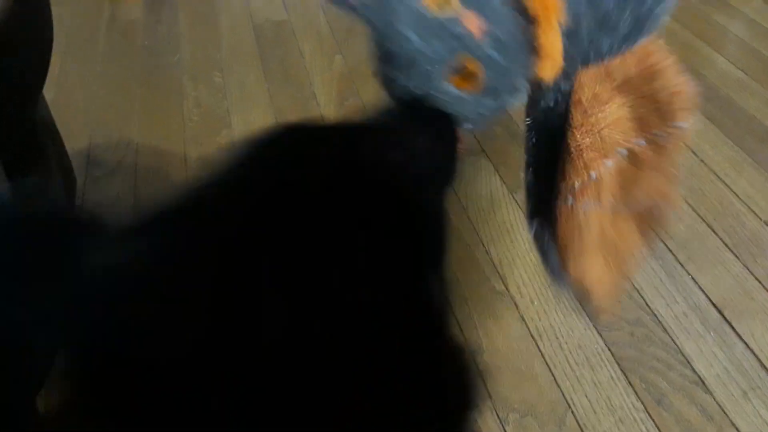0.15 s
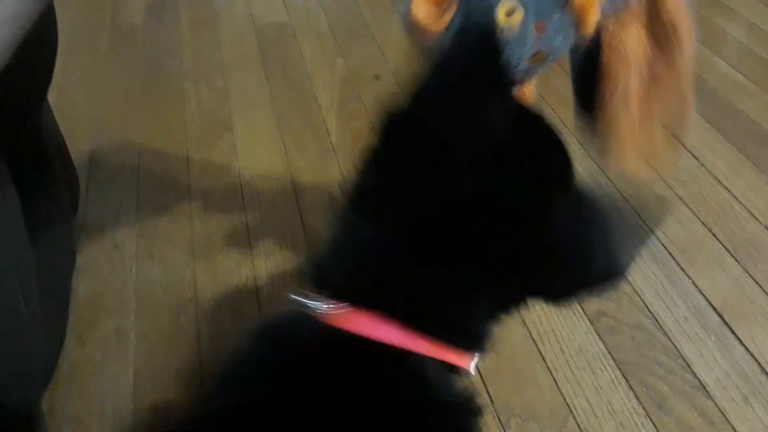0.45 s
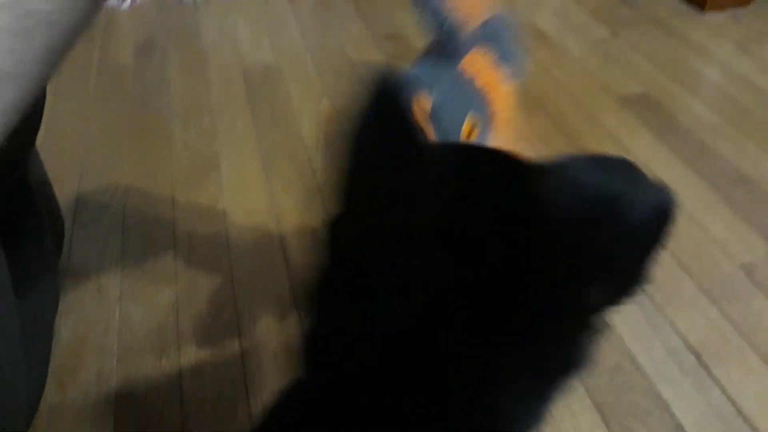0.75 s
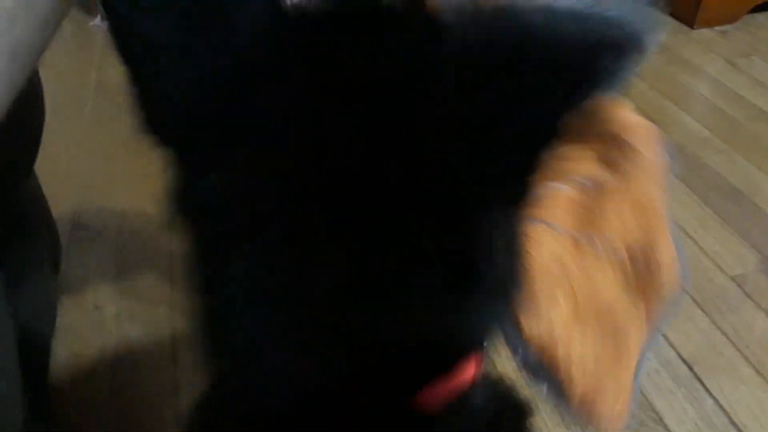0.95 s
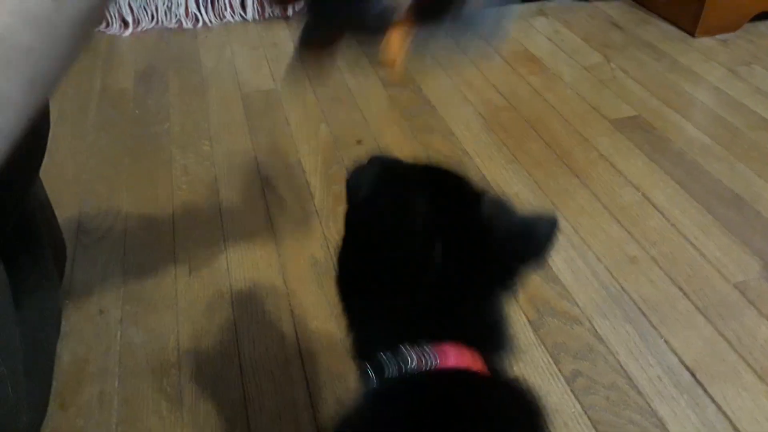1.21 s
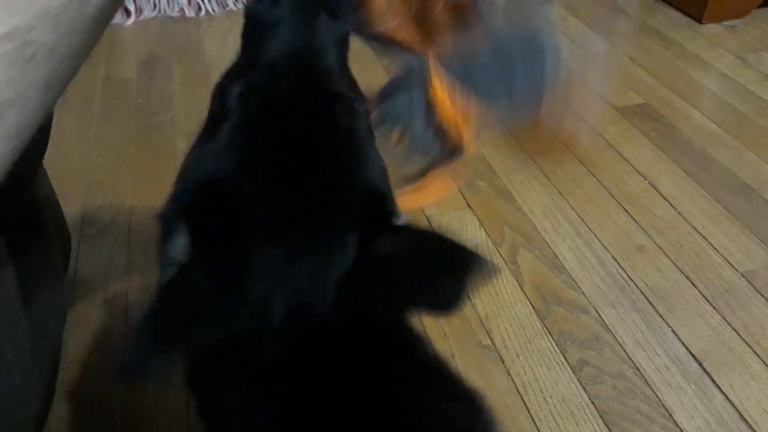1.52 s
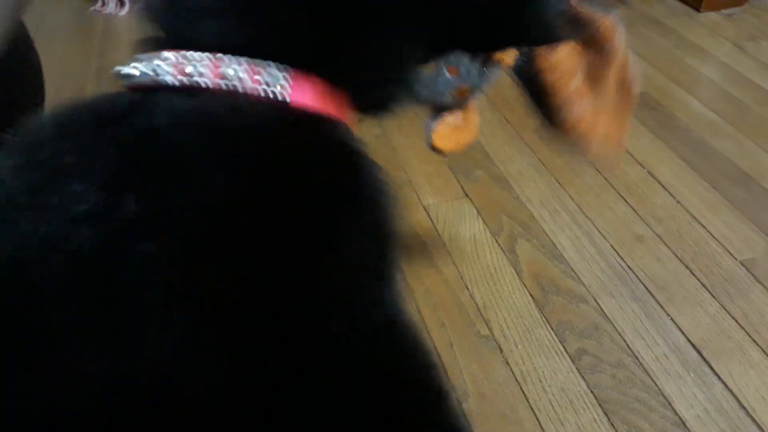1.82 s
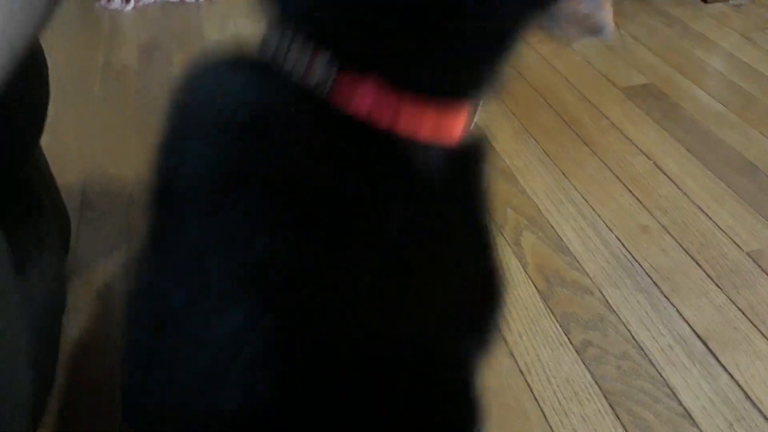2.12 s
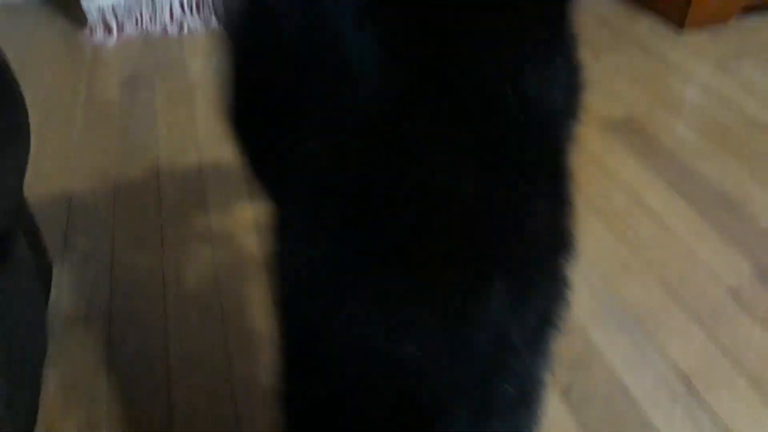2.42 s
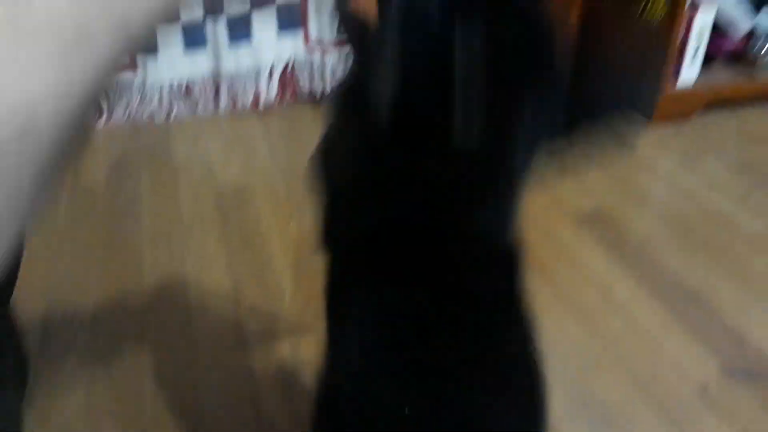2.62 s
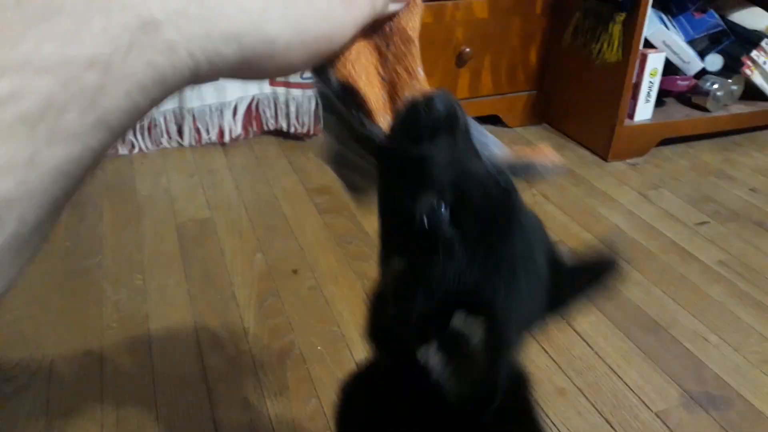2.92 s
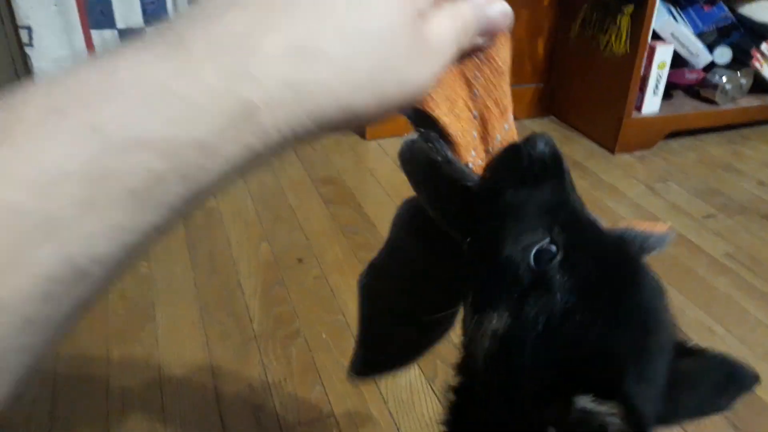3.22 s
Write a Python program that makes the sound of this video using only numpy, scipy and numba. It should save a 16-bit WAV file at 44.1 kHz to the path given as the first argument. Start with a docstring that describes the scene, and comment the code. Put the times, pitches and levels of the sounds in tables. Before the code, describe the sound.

Close, dry crackling of a crinkly dog toy runs throughout, with loud snaps, brief lulls and a final busy flurry; hollow paw knocks on wood come mid-way and near the end in a small room.

```python
"""Puppy tugging a crinkle toy

A puppy bites and tugs a plush toy with crinkle film inside, close to a phone in a room with a wooden floor.
The film buckles in short clusters of clicks, louder when the toy is worked hard; two hollows colour them.
Paws ring the floor boards as decaying sines; falling knocks and a thin squeak are gliding sines.
Shaped noise makes the low rumble. The two microphone ports nearly agree in the bass and part in the treble."""
import sys
import numpy as np
from scipy import signal
from scipy.fft import rfft, irfft
from scipy.io import wavfile
from scipy.ndimage import uniform_filter1d
from numba import njit

SR = 44100
rng = np.random.default_rng(int(sys.argv[2]) if len(sys.argv) > 2 else 0)


def generate_wav(signal):
    """Clip the signal to [-1, 1] and save it as 16-bit WAV at the path in sys.argv[1]."""
    frames = np.transpose(np.atleast_2d(signal))
    scaled = np.clip(frames, -1, 1) * 32767
    pcm = np.round(scaled).astype(np.int16)
    wavfile.write(sys.argv[1], SR, pcm)


N = 147735


def undb(db):
    """Decibels to an amplitude factor."""
    return 10 ** (np.asarray(db) / 20)


def rms(x):
    """Root mean square level."""
    return np.sqrt(np.mean(x ** 2))


def on_log(table, hz):
    """A (Hz, dB) table read on a log frequency axis."""
    f, db = np.array(table, float).T
    return np.interp(np.log(np.maximum(hz, 1)), np.log(np.maximum(f, 1)), db)


def causal(db):
    """Short causal (minimum-phase) response with the given gains on an even frequency grid."""
    cepstrum = irfft(db * np.log(10) / 20)
    cepstrum[1:len(db) - 1] *= 2
    cepstrum[len(db):] = 0
    return irfft(np.exp(rfft(cepstrum)))


# Swell of the low rumble under the take. Each row: time in seconds, level in dB before RUMBLE_GAIN_DB.
RUMBLE_LEVEL = [(0.0, -78), (0.23, -85), (0.38, -71), (0.45, -73), (0.58, -72), (1.2, -65), (1.34, -58),
                (1.41, -59), (1.56, -67), (1.87, -65), (2.02, -70), (2.23, -75), (3.13, -61), (3.27, -75),
                (3.35, -69)]
# Colour of the rumble in the room. Each row: frequency in Hz, relative level in dB per Hz.
RUMBLE_SPECTRUM = [(15, -55), (25, -10), (86, 2), (128, 6), (151, 3), (172, -2.5), (251, -10), (400, -11),
                   (520, -12), (880, -120)]
RUMBLE_GAIN_DB = 3
RUMBLE_SIDE = .2  # amount of opposite noise at the two ports


def room_tone():
    """A low rumble of shaped noise that swells as the dog moves, nearly the same at both ports."""
    hz = np.arange(N // 2 + 1) * SR / N
    gain = undb(on_log(RUMBLE_SPECTRUM, hz)) * (hz > 15)
    mid, side = irfft(rfft(rng.standard_normal((2, N))) * gain, N)
    level = undb(RUMBLE_GAIN_DB + np.interp(np.arange(N) / SR, *np.array(RUMBLE_LEVEL).T))
    return level / rms(mid) * (mid + RUMBLE_SIDE * side * np.array([[1], [-1]]))


# Hollow knocks that fall in pitch.
# Each row: start in seconds, level in dB before rise and fade, start pitch in Hz, fall in Hz per second.
FALLING_KNOCKS = [(0.493, -44, 375, 2300), (1.213, -37.5, 418, 1780), (1.419, -35.5, 385.6, 2220)]
FALL_RISE_S, FALL_T60_S = .004, 0.25


def falls():
    """Short low tones that sag in pitch, by an octave at most, as they fade."""
    out = 0
    for at, db, hz, fall in FALLING_KNOCKS:
        t = np.maximum(np.arange(N) / SR - at, 0)
        pitch = np.maximum(hz - fall * t, hz / 2)
        rise = 1 - np.exp(-t / FALL_RISE_S)
        fade = undb(db - 60 * t / FALL_T60_S)
        out = out + fade * rise * np.sin(2 * np.pi * np.cumsum(pitch) / SR)
    return out


# A thin squeak that glides down. Each row: time in seconds, pitch in Hz, level in dB before the port gains.
SQUEAK_GLIDE = [(2.92, 10600, -85), (2.945, 10350, -60), (2.975, 9850, -60), (3.0, 9400, -64),
                (3.02, 9300, -85)]


def squeak():
    """A faint whistle, its gliding sine made unsteady by smoothed noise, louder at the right port."""
    at, hz, db = np.array(SQUEAK_GLIDE).T
    t = np.arange(N) / SR
    rough = 1 + 4.0 * uniform_filter1d(rng.standard_normal(N), size=200)
    level = undb(np.interp(t, at, db, -140, -140))
    pitch = np.interp(t, at, hz)
    tone = level * rough * np.sin(2 * np.pi * np.cumsum(pitch) / SR)
    return tone * np.array([[.4], [1.6]])  # left, right


# Paws on the boards. Each row: start in seconds, level in dB before THUD_GAIN_DB, length of the push in
# seconds, pitch of that spot as a ratio to the board modes.
PAW_THUDS = [(0.236, -40.5, 0.0061, 0.73), (0.325, -52, 0.0019, 1.15), (0.496, -47, 0.0013, 1.12),
             (0.677, -59, 0.0031, 1.0), (0.841, -56, 0.002, 0.86), (1.177, -40, 0.0014, 0.92),
             (1.216, -27, 0.0023, 1.11), (1.246, -36, 0.0042, 1.02), (1.275, -39, 0.0037, 1.14),
             (1.339, -39, 0.0034, 1.0), (1.419, -23, 0.0025, 0.94), (1.442, -32.5, 0.0038, 0.91),
             (1.471, -34, 0.0046, 0.91), (1.493, -33.5, 0.0018, 0.96), (1.528, -40, 0.0016, 1.02),
             (2.247, -61, 0.0031, 1.06), (2.527, -49, 0.0032, 1), (2.736, -38.5, 0.0016, 0.96),
             (2.921, -33.5, 0.005, .85), (2.956, -42, 0.004, 1.1), (3.016, -36.5, 0.003, 0.86),
             (3.049, -50, 0.003, 1.1), (3.1, -52, 0.0049, 0.95), (3.158, -50, 0.0026, 1),
             (3.201, -41, 0.0033, 1.28), (3.226, -45, 0.0035, .85), (3.259, -49, 0.0035, 0.84),
             (3.305, -58, 0.0051, 0.64)]
# Modes of the wooden floor. Each row: frequency in Hz before the spot's ratio, level in dB before the
# paw's own spread, time to fall by 60 dB in seconds.
BOARD_MODES = [(108, -1, 0.051), (145.7, -1.5, 0.27), (187, 2.5, 0.23), (240, 1.5, 0.088),
               (320, -2.5, 0.15), (399, 3.5, 0.053), (513, 3, 0.082)]
THUD_GAIN_DB, PAW_SPREAD_DB = -8.5, 2
BASS_CUT_HZ = 91


def thuds():
    """A soft push of a paw rings the floor boards: decaying sines smoothed over the length of the push."""
    t = np.arange(int(.4 * SR)) / SR
    out = np.zeros(N + SR)
    turns = rng.standard_normal((len(PAW_THUDS), len(BOARD_MODES)))
    for (at, db, push, pitch), turn in zip(PAW_THUDS, turns):
        ring = np.zeros(len(t))
        for k, (hz, mode_db, t60) in enumerate(BOARD_MODES):
            decay = undb(mode_db + PAW_SPREAD_DB * turn[k] - 60 * t / t60)
            ring += (-1) ** k * decay * np.sin(2 * np.pi * pitch * hz * t)
        pad = np.hanning(max(int(push * SR), 3))
        thud = np.convolve(ring, pad / pad.sum())[:len(t)]
        start = int(at * SR)
        out[start:start + len(t)] += undb(db + THUD_GAIN_DB) * thud
    return signal.sosfilt(signal.butter(2, BASS_CUT_HZ, "high", fs=SR, output="sos"), out[:N])


ECHO_DB, ECHO_T60_S = -10.5, .2


def room(x):
    """The room's short tail is fading noise, shared by the ports in the bass and separate in the treble."""
    t = np.arange(int(.4 * SR)) / SR
    noise = rng.standard_normal((2, len(t)))
    low = signal.sosfilt(signal.butter(2, 1600, fs=SR, output="sos"), noise)
    unit_energy = np.sqrt(2 * np.log(1000) / ECHO_T60_S / SR)
    shape = undb(ECHO_DB - 60 * t / ECHO_T60_S) * unit_energy * (t > .003)
    tail = (noise - low + low[0]) * shape
    return x + signal.fftconvolve(x, tail, axes=1)[:, :N]


@njit
def band(x, hz, width):
    """Resonant band-pass whose centre may move every sample, gain 1 at the centre."""
    y, b, l = np.empty(len(x)), 0., 0.  # b and l are the band and low states
    for i in range(len(x)):
        g, k = np.tan(np.pi * hz[i] / 44100), width / hz[i]
        v = (b + g * (x[i] - l)) / (1 + g * (g + k))
        b, l, y[i] = 2 * v - b, l + 2 * g * v, k * v
    return y


# Two hollows of the toy that colour the crackle.
# Each row: time in seconds, lower pitch in Hz, upper pitch in Hz, share added in dB.
TOY_HOLLOWS = [(0, 4320, 5660, -2), (.5, 4350, 5130, -4.5), (1.0, 4500, 5130, -3.5), (1.5, 4330, 5600, -1),
               (1.85, 4400, 5000, 3), (2.2, 5360, 6000, -23), (2.45, 4240, 6040, -18),
               (2.75, 4230, 5240, -2.5), (2.95, 4000, 5130, 1.5), (3.1, 4140, 5120, 5.5),
               (3.35, 4100, 4870, 5)]
HOLLOW_WIDTH_HZ = 142.


def hollows(x):
    """The toy's two hollows ring along as moving resonances and shift as it is squeezed."""
    table = np.array(TOY_HOLLOWS, float).T
    low, high, db = (np.interp(np.arange(N) / SR, table[0], column) for column in table[1:])
    ports = []
    for port in x:
        ringing = band(port, low, HOLLOW_WIDTH_HZ) + band(port, high, HOLLOW_WIDTH_HZ)
        ports.append(port + undb(db) * ringing)
    return np.array(ports)


# Colour of the crinkle film. Each row: frequency in Hz, relative level in dB per Hz.
FILM_COLOUR = [(150, -46.5), (260, -28), (326, -18), (415, -17), (528, -21.5), (586, -16), (759, -15.5),
               (1110, -7), (1460, -15), (1740, -8), (1970, -11), (2420, -4), (3360, -6.5), (3700, -4),
               (4350, -1), (5600, -3), (6940, -6.5), (8250, -17), (11900, -23.5), (15100, -30),
               (16200, -41)]
# Difference between the microphone ports. Each row: frequency in Hz, left minus right in dB.
PORT_DIFFERENCE = [(1300, 0.5), (2400, 1.5), (4400, -6.5), (6000, -7.5), (8100, -7), (11000, -12.5),
                   (15000, -5)]
# Where the toy is held before the phone. Each row: time in seconds, left minus right in dB, before
# scaling by the share that differs between the ports.
TOY_SIDEWAYS = [(0, 10), (.8, -1), (2.3, 1), (3.35, -6.5)]
BUCKLE_S = .0011  # standard deviation of click times about the middle of a cluster
MAIN_CLICK = 1.75  # size of the middle click against the others' standard deviation
LAG_S, LAG_SPREAD_S = -0.000073, .00008  # left behind right, negative when left leads
LOW_HZ, HIGH_HZ = 1600, 7986  # edges of the low and high parts
APART_HZ = 2620  # around this the ports begin to hear each click at different strength
APART_MOST = 0.72  # largest share of a click that differs between the ports


def film(t, db, low_db, high_db, colour_db, count):
    """Each buckle is a swelling and fading cluster of clicks with its own colour and lag between the ports."""
    grid = np.linspace(0, SR / 2, 1025)
    centres = 250 * 2 ** np.arange(0, 6.5, .5)  # half-octave bands, Hz
    each = rng.standard_normal((len(t), len(centres) + 1))  # colour per band, then lag
    hit = rng.standard_normal((len(t), count, 4))  # time, shared size, left size, right size
    hit[:, 0, 0] = 0
    hit[:, 0, 1:] = MAIN_CLICK * np.sign(hit[:, 0, 1:])
    side_db = np.interp(t, *np.array(TOY_SIDEWAYS).T)[:, None]
    late = BUCKLE_S * hit[..., 0]
    lag = (LAG_S + LAG_SPREAD_S * each[:, -1:]) / 2
    out = np.zeros((2, N))
    for k, hz in enumerate(centres):
        tilt = low_db * (hz < LOW_HZ) + high_db * (hz > HIGH_HZ)
        size = undb(db + tilt + colour_db * each[:, k])[:, None]
        bell = np.maximum(-6 * (np.log2(np.maximum(grid, 1) / hz) / .5) ** 2, -50)
        apart = APART_MOST / (1 + (APART_HZ / hz) ** 3)
        for port, sign in enumerate((1, -1)):  # left, right
            clicks = np.sqrt(1 - apart) * hit[..., 1] + np.sqrt(apart) * hit[..., 2 + port]
            clicks = clicks / np.sqrt(np.sum(clicks ** 2, axis=1, keepdims=True))  # same energy per cluster
            clicks = size * clicks * undb(sign * apart * side_db / 2)
            at = np.clip(((t[:, None] + late + sign * lag) * SR).astype(int), 0, N - 1)
            train = np.bincount(at.ravel(), clicks.ravel(), N)
            ring = causal(bell + on_log(FILM_COLOUR, grid) + sign * on_log(PORT_DIFFERENCE, grid) / 2)
            out[port] += signal.oaconvolve(train, ring)[:N]
    return out


# How hard the toy is worked. Each row: time in seconds, crackle level in dB before CRACKLE_GAIN_DB, low part
# and high part in dB, both taken against their average over the buckles.
TUG_STRENGTH = [(0.0, -35, -3.5, -7), (0.041, -45, -29, -24), (0.11, -36.5, -3.5, -0.5),
                (0.14, -33.5, -16.5, -13.5), (0.251, -30.5, -1.5, -8), (0.321, -38, -8.5, -14.5),
                (0.33, -29, -4, -2.5), (0.37, -29.5, -13, -17), (0.38, -26, -2.5, -6.5),
                (0.47, -40.5, -15.5, -18), (0.48, -32.5, 0.5, -5.5), (0.57, -40, -14, -9.5),
                (0.611, -29, -4, -4.5), (0.67, -36.5, -12.5, -9), (0.68, -31, -1, 0), (0.74, -43, -10, -8),
                (0.75, -36, -6, 0), (0.791, -42, -19, -14), (0.84, -33.5, -7.5, -11.5),
                (1.031, -31, -8, -7), (1.05, -36.5, -6.5, -21), (1.091, -28.5, -6, -8.5),
                (1.27, -38, -7.5, -6.5), (1.289, -42.5, 0, -16), (1.339, -30.5, -2, -2.5),
                (1.47, -35, -13, -16.5), (1.54, -28, -14.5, -8), (1.558, -23, -0.5, -3),
                (1.599, -29, -11.5, -5.5), (1.69, -36.5, -6, -9.5), (1.789, -35, -3.5, -9),
                (1.809, -27, -3.5, -6), (1.87, -34.5, -9.5, -15), (1.92, -31, -4, -6.5),
                (2.021, -38.5, 1, -5.5), (2.05, -45.5, -15, -17), (2.201, -35.5, -8.5, -8),
                (2.231, -47.5, -5, -14), (2.322, -30, -14, -8.5), (2.549, -43, -18.5, -9.5),
                (2.579, -35, -6, -5), (2.62, -33, -14.5, -10), (2.76, -23, -5.5, -2.5),
                (2.839, -40, -14.5, -13), (2.86, -36, -6.5, -10), (2.99, -40.5, -9, -9),
                (3.08, -32, -8, -3.5), (3.13, -38.5, -12, -11), (3.16, -31.5, -10.5, -10),
                (3.289, -48.5, -11.5, -21), (3.34, -34.5, -9.5, -18), (3.35, -45, -7, -20)]
CRACKLES_PER_S, CRACKLE_GAIN_DB, CRACKLE_COLOUR_DB = 1700, 13.5, 4.5
CRACKLE_SPREAD_DB, BIGGEST_CRACKLE_DB = 2, 5.5  # mean before the limit, and limit, over the smallest


def crackle():
    """Many small buckles at random moments and of scattered size, their level following the tug."""
    chance = rng.random((int(CRACKLES_PER_S * N / SR), 2))
    t = chance[:, 0] * N / SR
    tug = np.array(TUG_STRENGTH).T
    level, low, high = (np.interp(t, tug[0], column) for column in tug[1:])
    size_db = np.minimum(-CRACKLE_SPREAD_DB * np.log(1 - chance[:, 1]), BIGGEST_CRACKLE_DB)
    power_db = 10 * np.log10(np.mean(undb(2 * size_db)) * len(t) / N)  # mean power per sample
    db = level + size_db - power_db + CRACKLE_GAIN_DB
    return film(t, db, low - low.mean(), high - high.mean(), CRACKLE_COLOUR_DB, count=4)


# Loudest snaps of the film, close to the phone. Each row: middle in seconds, level in dB before SNAP_GAIN_DB,
# extra low part in dB, extra high part in dB, both before the limit of 6 dB either way.
FILM_SNAPS = [(0.0082, -23, 0, 3), (0.016, -36, 2, 4), (0.027, -18, -3, 3), (0.04, -29, -1, -4),
              (0.0613, -20.5, 7, 3), (0.079, -27, -8, 5), (0.109, -22, -11, -2), (0.128, -20, 8, 6),
              (0.1824, -6.5, 2.5, -3), (0.1946, -25, -7, 2), (0.2257, -14, 15, -2), (0.2407, -9, -2, 7),
              (0.245, -18, -3, 3), (0.2532, -7, -11, 7), (0.274, -17, 7, 6), (0.3047, -23, -5, 7),
              (0.3196, -15, 7, 0), (0.3323, -28, 7, 4), (0.3483, -12, 2, -4), (0.3624, -20, 1, 7),
              (0.382, -4.5, 1, -3), (0.439, -13, 0, -11), (0.4486, -15, 3, 6), (0.4647, -18, 8, 0),
              (0.4796, -9, -2, 4), (0.4946, -15, -2, -10), (0.503, -11, 5, 6), (0.546, -26, 9, 3),
              (0.554, -18, 3, 0), (0.568, -19, -2, 0), (0.5809, -27, -4, 0), (0.6224, -13, 11, -3),
              (0.6334, -14, -2, 8), (0.6862, -21.4, 0, -3), (0.714, -25.1, 0, -4), (0.743, -23, -3, -2),
              (0.7637, -21.2, -4, -4), (0.7986, -28.7, -2, 0), (0.822, -23, 5, -1), (0.829, -9, 3, -1),
              (0.8383, -13, -4, -9), (0.8532, -23, 1, -6), (0.867, -20, 8, -3), (0.8765, -10, -6, 3),
              (0.886, -25, 12, 0), (0.898, -15, -20, 7), (0.9198, -26, 0, 1), (0.9422, -9, 8, -3),
              (0.959, -16, -2, 9), (0.9784, -18, -1, 9), (1.0182, -15, 4, -3), (1.033, -15, 9, 3),
              (1.126, -14, -3, -6), (1.152, -10, -8, 4), (1.2114, -11.5, -1, -2), (1.223, -26, 7, 8),
              (1.2658, -16, 4, 7), (1.2994, -23, 2, 8), (1.3143, -16, -7, 5), (1.335, -6, 0, -5),
              (1.365, -25, 7, 3), (1.392, -18, -5, 7), (1.397, -17, -6, 4), (1.407, -14, -1, 7),
              (1.435, -22, 3, 9), (1.4505, -31, 5, 8), (1.4597, -27, 4, -5), (1.48, -26, -4, 13),
              (1.488, -29, -8, -3), (1.4943, -9, -3, 0), (1.5022, -20, -11, 13), (1.5668, -7, 2, 7),
              (1.6232, -6, 5, 6), (1.653, -15, -3, -8), (1.677, -22.7, -9, -8), (1.6934, -24, -4, -2),
              (1.72, -31, 3, 5), (1.7356, -12, 9, -8), (1.803, -3, -1, 3), (1.8698, -23, 0, 3),
              (1.9048, -22, 4, 7), (1.9468, -21, -2.5, 4.5), (1.971, -19, -5, 4), (1.991, -23, 4, 1),
              (1.9995, -22, 2, -2), (2.0902, -28, 0, -10), (2.112, -11, -9, -0.5), (2.117, -30, -9, -6),
              (2.1526, -39, 0, 1), (2.172, -19, 21, 2), (2.195, -38, 11, 4), (2.2073, -37, 8, 3),
              (2.262, -20, 7, 5), (2.291, -32, -4.5, -2), (2.3285, -7, 14, 0), (2.3657, -14, 0, 14),
              (2.381, -20, -4, 5), (2.3868, -19, 1, 1), (2.4193, -15, -12, -5), (2.4841, -34, 1, -5),
              (2.5827, -23.1, 0, -1), (2.64, -23, 7, 3), (2.66, -26, 0, 5), (2.6832, -12, -6, -12),
              (2.7516, -21, 8, -16), (2.7691, -7, -0.5, -9), (2.864, -15, -4, -16), (2.8707, -12, 6, 8),
              (2.879, -16, -5, 9), (2.903, -25, -5, 3), (2.911, -13.5, -3.5, 7.5), (2.9315, -23, 8, 0),
              (2.9437, -25, -2, 2), (2.952, -31, 7, 3), (2.99, -27, -4, 6), (3.041, -16, 4, 2),
              (3.0543, -13, -5, -6), (3.0747, -19, -1, -8), (3.0993, -6.5, 3, -10), (3.1108, -32, -3, 0),
              (3.1403, -13, 4, -3), (3.1623, -13, 5, 6), (3.177, -15, -10, -3), (3.1885, -8, -5.5, -4),
              (3.2067, -10.5, 3.5, 2.5), (3.223, -14, 0.5, -2), (3.245, -11, 0.5, 1), (3.2633, -29, 7, -5),
              (3.3089, -17, 3, -3), (3.3356, -21.5, 5, 5)]
SNAP_GAIN_DB, SNAP_COLOUR_DB = 23.5, 2


def snaps():
    """The single loud buckles, each a fuller cluster of clicks."""
    t, db, low, high = np.array(FILM_SNAPS).T
    low, high = np.clip([low, high], -6, 6)
    return film(t, db + SNAP_GAIN_DB, low, high, SNAP_COLOUR_DB, count=14)


def scene():
    """The film rings in the toy's hollows and the room; the other sounds reach the ports without the tail."""
    toy = room(hollows(crackle() + snaps()))
    return room_tone() + falls() + squeak() + thuds() + toy


CEILING, TOP_HZ = .9, 16300  # full-scale amplitude, upper edge of the phone


def record(dry):
    """The phone rounds the loudest peaks and cuts the top."""
    cut = signal.ellip(12, .2, 90, TOP_HZ, fs=SR, output="sos")
    return signal.sosfilt(cut, CEILING * np.tanh(dry / CEILING))


dry = scene()
out = record(dry)
generate_wav(out)
```